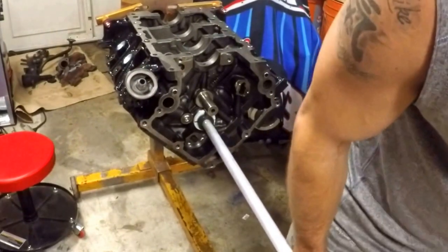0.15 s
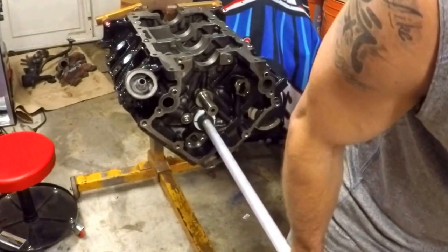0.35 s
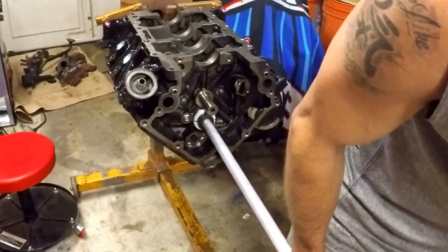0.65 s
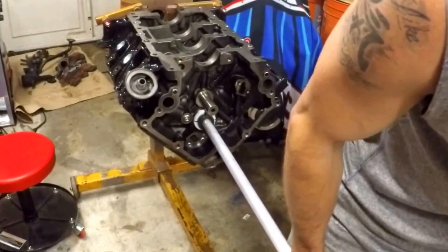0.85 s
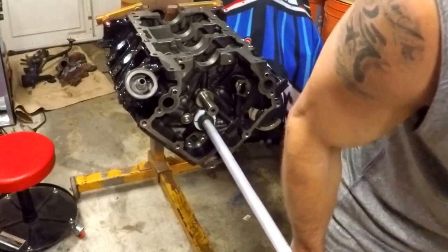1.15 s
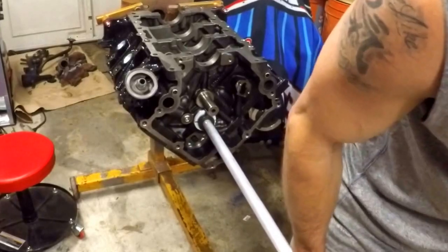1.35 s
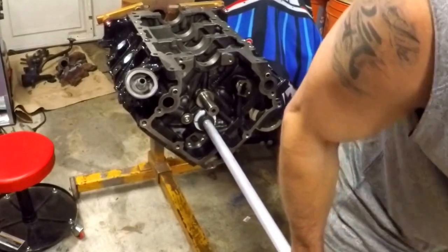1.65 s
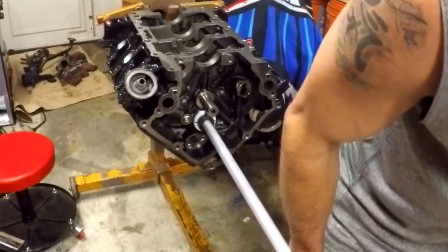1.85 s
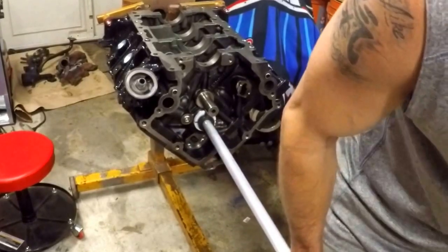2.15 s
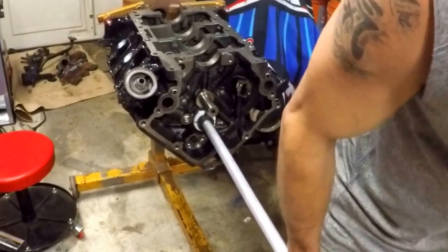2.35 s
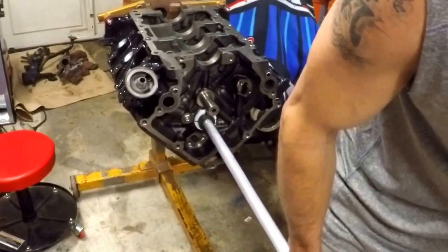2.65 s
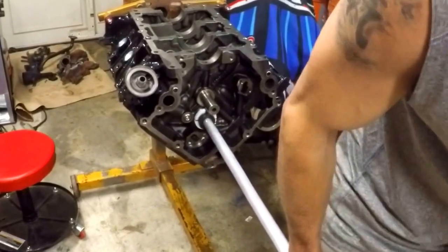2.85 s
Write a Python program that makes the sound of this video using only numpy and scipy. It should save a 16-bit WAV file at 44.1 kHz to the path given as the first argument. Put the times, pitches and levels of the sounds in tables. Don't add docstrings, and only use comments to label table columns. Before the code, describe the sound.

Four loud, evenly spaced metallic hammer blows on a rod against an engine block, after one light tap

```python
import sys
import numpy as np
from scipy import signal
from scipy.fft import rfft, irfft
from scipy.io import wavfile
from scipy.ndimage import uniform_filter1d

SR = 44100
rng = np.random.default_rng(int(sys.argv[2]) if len(sys.argv) > 2 else 0)


def rack_gain(trim_db):
    fader = np.asarray(trim_db, float)
    return 10 ** (fader / 20)


def dump_mix(stems):
    frames = np.atleast_2d(stems).T
    limited = np.clip(frames, -1, 1)
    pcm = np.round(limited * 32767).astype(np.int16)
    wavfile.write(sys.argv[1], SR, pcm)


N = 132300

# (time [s], strength [dB], brightness [dB], rod ring [dB])
BLOWS = [
    (1.045, 0.5, -1.5, -3),
    (1.64, -2, 1, -0.5),
    (2.247, -3, 2, -1.5),
    (2.861, 1, -5, -3),
]
# (frequency [Hz], density [dB])
CLOTH_SPECTRUM = [(800, -21), (2500, -2.5), (3800, -11.5), (5400, -0.5), (7400, -21), (10200, -12.5),
                  (12500, -26), (16000, -43)]


def read(points, hz):
    f, value = np.transpose(points)
    return np.interp(np.log(hz + 1), np.log(f + 1), value)


def evened(x):
    return x / np.sqrt(np.mean(x ** 2) + 1e-20)


def add(mix, start_s, sound):
    part = mix[round(start_s * SR):][:len(sound)]
    part += sound[:len(part)]


def noise(spectrum, size, patchy_db=0.):
    frames, hz = size // 256 + 5, np.fft.rfftfreq(1024, 1 / SR)
    real, imag, patches = rng.standard_normal((frames, 513, 3)).T
    patches = uniform_filter1d(patches, 10, 0)
    patches = evened(uniform_filter1d(patches, 10, 1))
    gain_db = read(spectrum, hz)[:, None] + patchy_db * patches
    spectra = (real + 1j * imag) * rack_gain(gain_db)
    return evened(signal.istft(spectra, nperseg=1024, noverlap=768)[1][:size])


def ring(modes, length_s, shift_db=0.):
    hz, db, t60_s = np.transpose(modes)
    t = np.arange(round(length_s * SR))[:, None] / SR
    level = rack_gain(db + shift_db - 60 * t / t60_s)
    return (level * np.sin(2 * np.pi * hz * t)).sum(1)


def garage(spectrum):
    # (frequency [Hz], t60 [s])
    room_t60 = [(100, 0.52), (300, 0.46), (700, 0.31), (1500, 0.41), (3000, .42), (6000, 0.39),
                (10000, 0.31), (15000, 0.16)]
    hz, t, spectra = signal.stft(noise(spectrum, SR), SR, nperseg=256)
    decay = rack_gain(-60 * t / read(room_t60, hz)[:, None])
    return signal.istft(spectra * decay, SR, nperseg=256)[1][:SR]


def air():
    # (frequency [Hz], density [dB])
    air_spectrum = [(60, -18), (120, -3.5), (230, -9), (500, -10.5), (800, -8), (1400, -12.5), (1700, -23),
                    (4000, -28), (14500, -41.5), (16000, -77)]
    return rack_gain(-53) * noise(air_spectrum, N, patchy_db=2.5)


def rumble():
    # (frequency [Hz], density [dB])
    rumble_spectrum = [(8.8, -62), (15, -21), (36, -0.5), (54, 1), (68, -3), (87, -13), (166, -18.5),
                       (200, -43.5), (260, -61.5), (440, -120)]
    hz = np.fft.rfftfreq(N, 1 / SR)
    gain = rack_gain(read(rumble_spectrum, hz)) * (hz < 220) * (hz > 12)
    low = irfft(rfft(rng.standard_normal(N)) * gain, N)
    return rack_gain(-45) * evened(low)


def light_tap():
    # (time [s], strength [dB])
    taps = [
        (0.3849, -7.5),
        (0.3905, -23),
    ]
    # (frequency [Hz], level [dB], t60 [s])
    body_modes = [(152, -12.5, 0.117), (296, -7, 0.11), (561, -5.5, 0.062), (980, 9, 0.005)]
    # (frequency [Hz], density [dB])
    click_spectrum = [(200, -39), (1500, 8), (3300, -4), (4100, -16), (5200, -5), (8000, -15.5),
                      (12000, -18), (16000, -42)]
    click_db, click_t60_s = -4.5, 0.011
    wash_db, wash_rise_s = -39, 0.0024
    out, t = np.zeros(N), np.arange(600) / SR
    wash_rise = np.minimum(np.arange(SR) / (wash_rise_s * SR), 1)
    add(out, taps[0][0], rack_gain(wash_db) * garage(click_spectrum) * wash_rise)
    for s, db in taps:
        add(out, s, rack_gain(db - 17) * ring(body_modes, 0.15))
        click_decay = rack_gain(db - 12 + click_db - 60 * t / click_t60_s)
        add(out, s, click_decay * noise(click_spectrum, 600))
    return out


def bumps():
    # (time [s], level [dB])
    bump_events = [
        (2.672, -30.5),
        (0.39, -31),
        (0.87, -40),
    ]
    out = np.zeros(N)
    for s, db in bump_events:
        add(out, s, rack_gain(db) * ring([(75, -3, 0.1), (184, -8, 0.047)], 0.15))
    return out


def shirt():
    # (middle [s], half length [s], level [dB])
    swishes = [
        (0.844, 0.096, -55.5),
        (1.46, 0.12, -58.5),
        (2.084, 0.11, -58.5),
        (2.688, 0.11, -60.5),
    ]
    t, swell = np.arange(N) / SR, np.zeros(N)
    for middle_s, half_s, db in swishes:
        phase = np.clip((t - middle_s) / half_s, -1, 1)
        swell += rack_gain(db) * np.cos(np.pi / 2 * phase) ** 1.3
    return swell * noise(CLOTH_SPECTRUM, N, patchy_db=1.2)


def ticks():
    # (time [s], level [dB])
    tick_events = [
        (.774, -46),
        (2.546, -54),
    ]
    out, t = np.zeros(N), np.arange(600) / SR
    for s, db in tick_events:
        add(out, s, rack_gain(db - 60 * t / 0.0076) * noise(CLOTH_SPECTRUM, 600))
    return out


def blows():
    knock_hz = [331, 383, 580, 745, 890, 1010, 2297]
    # (level [dB], t60 [s])
    knock_modes = [(-23, 0.21), (-13.5, 0.19), (-14.5, 0.12), (-8, 0.1), (-9.5, 0.051), (6.5, 0.0083),
                   (-8.5, 0.049)]
    # (delay [s], level [dB])
    echoes = [(.0052, -6.5), (.0095, -10.5), (0.0143, -10.5), (.026, -14.5)]
    # (frequency [Hz], density [dB])
    crash_spectrum = [(100, -6), (300, -5), (900, 3.5), (1500, -2.5), (2400, -7.5), (3800, -9),
                      (5500, -14.5), (9000, -22.5), (15000, -29.5)]
    knock_db, knock_rise_s, mode_spread_db = 0.5, 0.00061, 1.8
    crash_db, crash_rise_s, snap_db, snap_t60_s = -10.5, 0.0025, 2.5, 0.039
    mic_low_hz = 230
    out, t = np.zeros(N), np.arange(SR) / SR
    arrivals = [(0.00081, 0.032)] + echoes
    for s, db, bright_db, _ in BLOWS:
        spread_db = mode_spread_db * rng.standard_normal(len(knock_modes))
        knock = ring(np.c_[knock_hz, knock_modes], 0.27, spread_db)
        knock = knock * np.minimum(t[:len(knock)] / knock_rise_s, 1)
        for k, (delay_s, echo_db) in enumerate(arrivals):
            polarity = (-1) ** k
            add(out, s + delay_s, polarity * rack_gain(db + knock_db + echo_db) * knock)
        snap = 1 + rack_gain(snap_db - 60 * t / snap_t60_s)
        shape = np.minimum(t / crash_rise_s, 1) * snap
        add(out, s, rack_gain(db + crash_db + bright_db) * shape * garage(crash_spectrum))
    return signal.sosfilt(signal.butter(2, mic_low_hz, "high", fs=SR, output="sos"), out)


def rod():
    rod_hz = [725, 948, 1060, 1232, 1260.5, 1264, 1367, 1427, 1515, 1583, 1793, 1916, 2272, 2428]
    # (level [dB], t60 [s])
    rod_modes = [(-15.5, 0.53), (-16.5, 0.62), (-20.5, .3), (6, 0.23), (-6.5, 0.52), (-6, 0.69),
                 (-4.5, 0.46), (1.5, .45), (-21.5, 0.25), (-9, 0.49), (-24, .55), (-27, 0.48), (-10, 0.47),
                 (-15.5, .6)]
    rod_db, rod_swell_s, mode_spread_db = -14.5, 0.0067, 1.5
    thud_hz, thud_db, thud_t60_s, thud_swell_s = 56.6, -27.5, 0.69, 0.02
    out, t = np.zeros(N), np.arange(SR) / SR
    mode_db, t60_s = np.transpose(rod_modes)
    polarity = (-1) ** np.arange(len(rod_modes))
    sines = np.sin(2 * np.pi * np.array(rod_hz) * t[:, None])
    rod_swell = 1 - np.exp(-t / rod_swell_s)
    thud = ring([(thud_hz, 0, thud_t60_s)], 0.5) * (1 - np.exp(-t[:SR // 2] / thud_swell_s))
    for s, db, _, ring_db in BLOWS:
        spread_db = mode_spread_db * rng.standard_normal(len(rod_modes))
        level = rack_gain(mode_db + spread_db - 60 * t[:, None] / t60_s)
        tones = (polarity * level * sines).sum(1)
        add(out, s, rack_gain(db + rod_db + ring_db) * tones * rod_swell)
        add(out, s, rack_gain(db + thud_db) * thud)
    return out


def scene():
    background = air() + rumble()
    handling = light_tap() + bumps() + shirt() + ticks()
    return (background + handling + blows() + rod())[None]


def low_pass(x):
    return signal.sosfilt(signal.butter(12, 16550, fs=SR, output="sos"), x)


def record(dry):
    duck_after_s, duck_step_db, duck_back_s = 0.063, -1, 0.074
    mic_top_hz, ceiling, knee = 15400, 0.74, 12
    t, duck_db = np.arange(N) / SR, np.zeros(N)
    for blow_s, *_ in BLOWS:
        since = t - blow_s - duck_after_s
        duck_db += duck_step_db * (since > 0) * np.exp(-np.maximum(since, 0) / duck_back_s)
    x = signal.sosfilt(signal.butter(10, mic_top_hz, fs=SR, output="sos"), dry)
    x = x * rack_gain(uniform_filter1d(duck_db, 60))
    x = x / (1 + abs(x / ceiling) ** knee) ** (1 / knee)
    return low_pass(x)


dry = scene()
out = record(dry)
dump_mix(out)
```